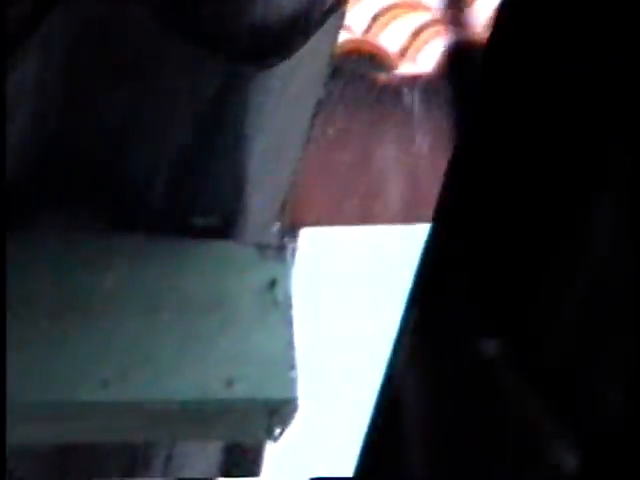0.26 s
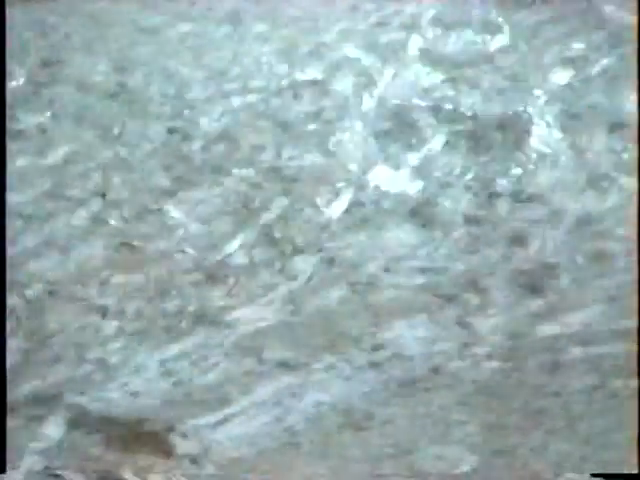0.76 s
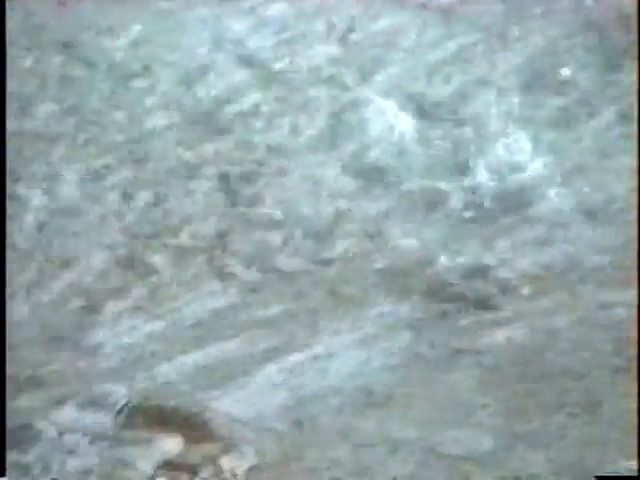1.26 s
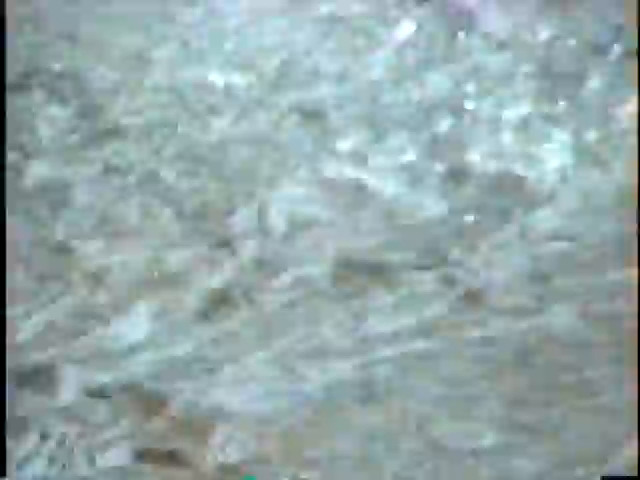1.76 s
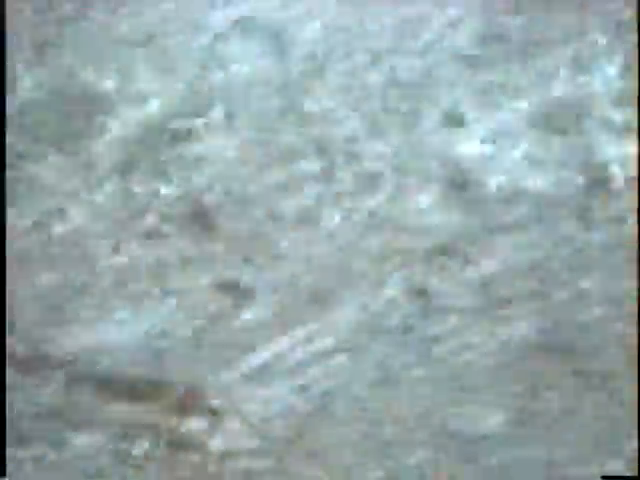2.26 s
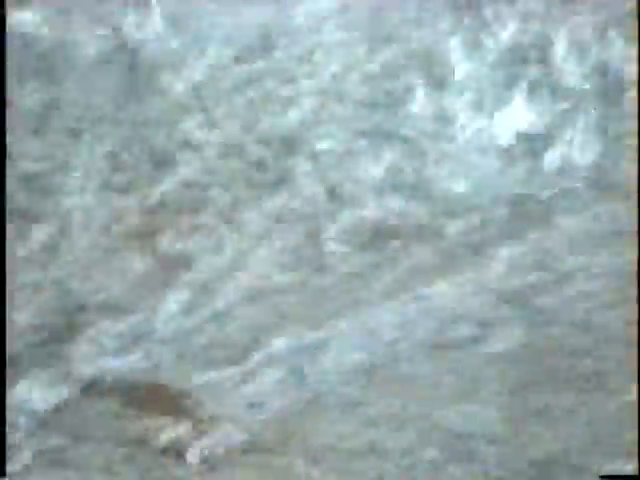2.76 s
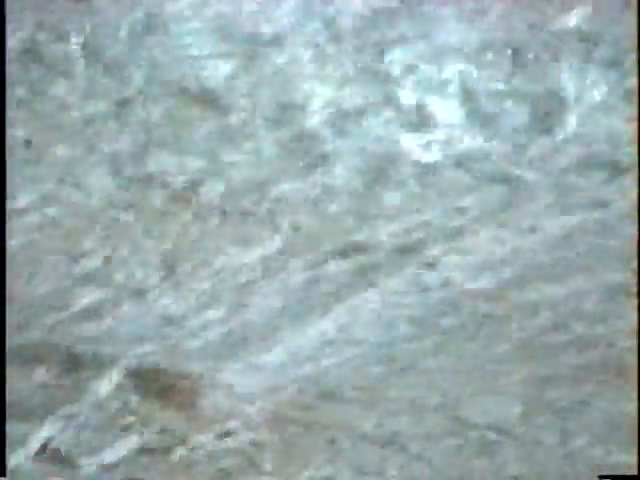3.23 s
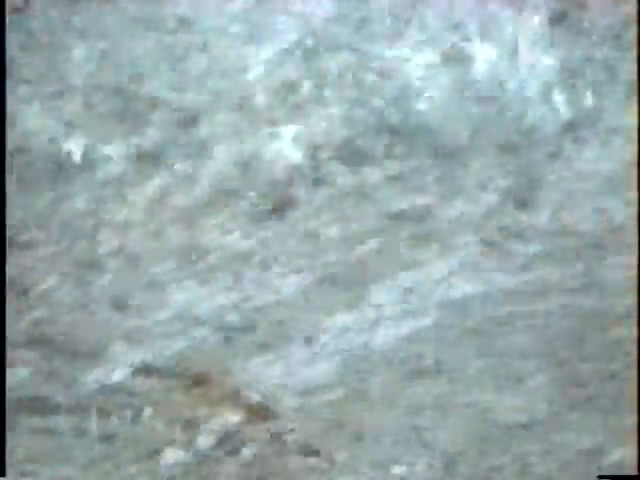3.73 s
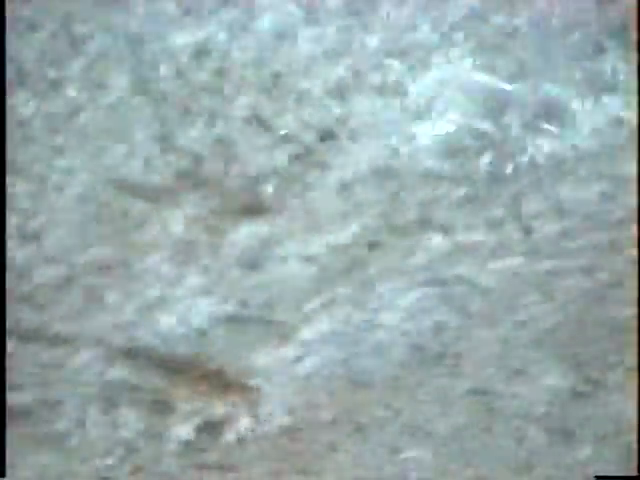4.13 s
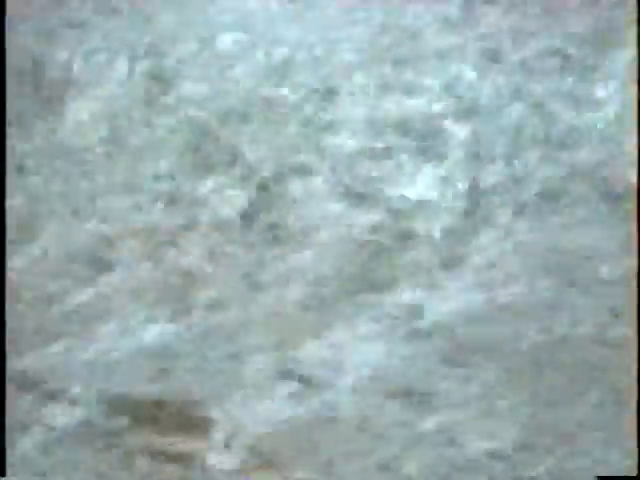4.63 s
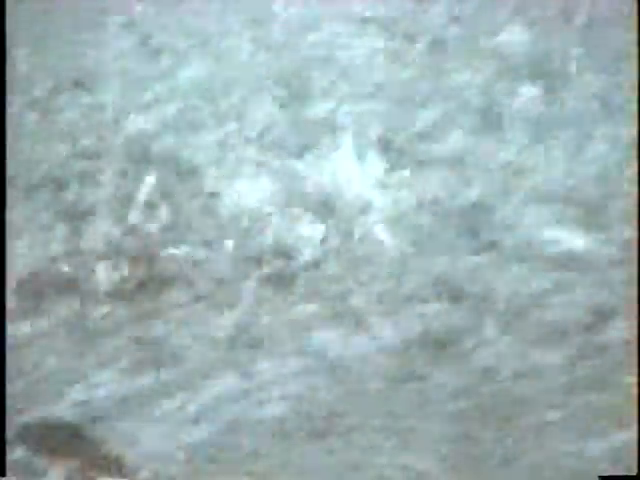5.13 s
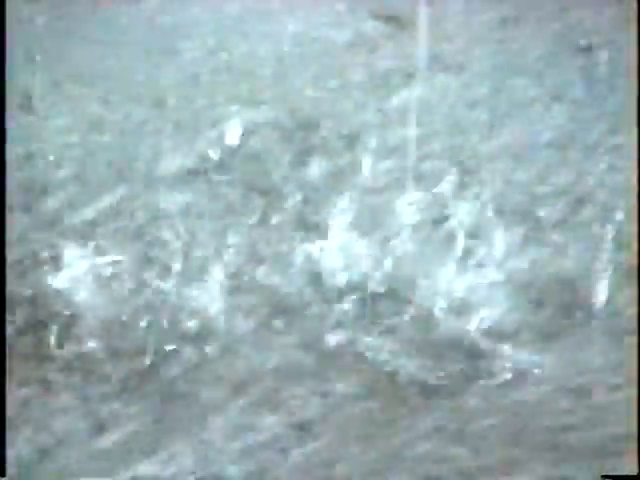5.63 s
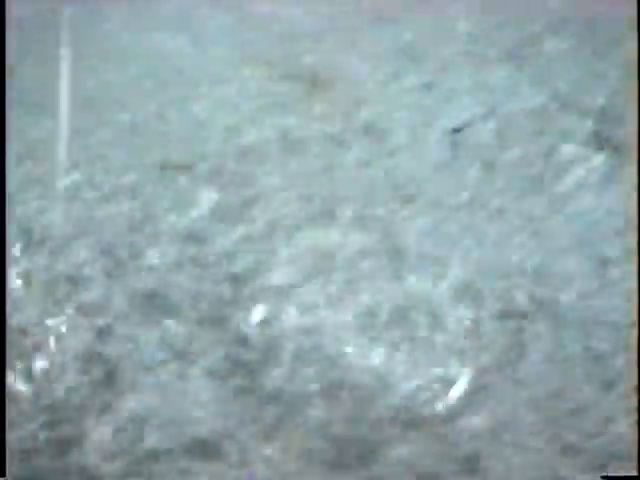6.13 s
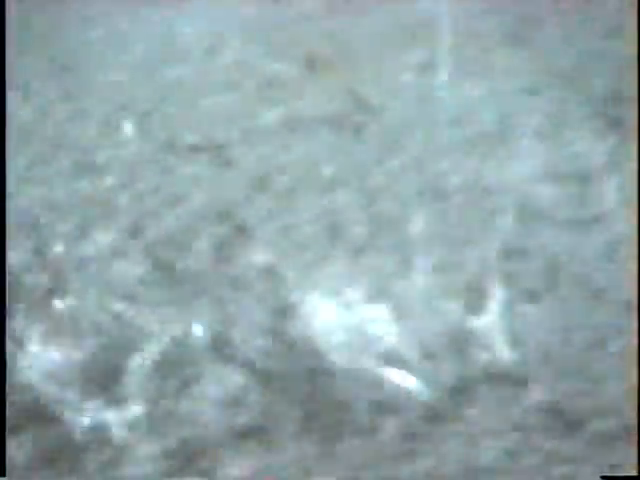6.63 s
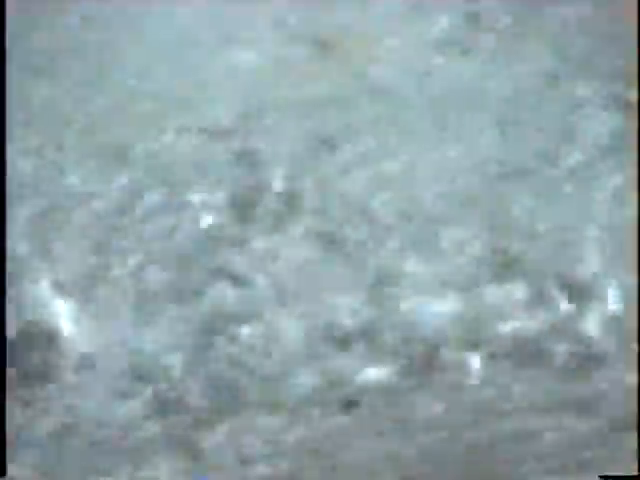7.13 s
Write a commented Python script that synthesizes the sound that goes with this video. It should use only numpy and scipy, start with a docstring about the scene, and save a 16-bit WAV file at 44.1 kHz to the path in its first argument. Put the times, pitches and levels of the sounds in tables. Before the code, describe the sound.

From 0 to 0.47 seconds heavy rain roars on a tile roof, mid-heavy and slightly hollow, with a small gurgle near 0.07 and a wet slap near 0.17. The sound drops almost to nothing for about 35 milliseconds, then returns abruptly at 0.5 as a dense downpour on flooded pavement, continuing without fading to about 7.4. It is a thick, broad wash with crisp patter, runoff spatter and tiny bubbles, its drumming and splashing fluctuating by a few decibels. Closer splashes slap irregularly, notably around 0.96, 2.0, 4.1 and sharply at 4.38; a tiny lull comes at 4.89. Hollow gurgles sound near 4.2, 4.7 and between 5.3 and 6.0, with soft low bumps mostly from 6.0 to 7.1. Nearly everything is on the left; the right holds only faint leakage and hiss. The camera's faint low hum and rumble are buried beneath, and the extreme treble is cut.

```python
"""Downpour under a roof, then over a pavement

Rain roars on a tile roof; after a break of some 35 ms it falls on a flooded pavement.
Shaped noise makes the wash of countless far drops; random clicks make the patter, the spray of water slapping
off the eaves and, through short rising rings, the bubbles. Gurgles and soft bumps are swelling bands of noise.
The camera takes the water, a faint mains hum and rumble on the left; the right has a faint leak and hiss.
A low drone of the electronics lies on both channels.
"""
import sys
import numpy as np
from scipy import signal
from scipy.fft import rfft, irfft
from scipy.io import wavfile

SR = 44100
rng = np.random.default_rng(int(sys.argv[2]) if len(sys.argv) > 2 else 0)


def unload_wav(signal):
    """Save mono or channel-first audio to the path in sys.argv[1] as 16-bit WAV at rate SR, clipped to [-1, 1]."""
    wavfile.write(
        sys.argv[1],
        SR,
        np.round(np.clip(np.atleast_2d(signal).T, -1, 1) * 32767).astype(np.int16),
    )


N = 325899
TIME = np.arange(N) / SR  # s
CUT_START, CUT_END = .4697, .5052  # the short break between roof and pavement, s


def gain_of(db):
    """Decibels to amplitude."""
    return 10 ** (np.asarray(db) / 20)


def evened(x):
    """Scales to rms 1."""
    return x / np.sqrt(np.mean(x ** 2) + 1e-20)


def add(mix, s, sound):
    """Mixes a sound in at time s, in seconds."""
    part = mix[max(round(s * SR), 0):][:len(sound)]
    part += sound[:len(part)]


def coloured(x, points):
    """Filters by a curve of (Hz, dB) points, joined along a logarithmic frequency axis."""
    hz, db = np.transpose(points)
    bins = np.fft.rfftfreq(len(x), 1 / SR)
    gain = gain_of(np.interp(np.log(bins + 1), np.log(hz), db))
    return irfft(rfft(x) * gain, len(x))


def band(x, hz, ratio):
    """A resonance from hz / ratio to hz * ratio, kept within the audible range."""
    ratio = max(ratio, 1.01)
    edges = np.clip([hz / ratio, hz * ratio], [10, 20], [SR / 3, SR / 2 - 100])
    return signal.sosfilt(signal.butter(2, edges, "band", fs=SR, output="sos"), x)


def swell(s, db):
    """A level curve as a gain around its median."""
    return gain_of(np.interp(TIME, s, db - np.median(db)))


def wander(depth_db, slow_hz, fast_hz, count=30):
    """A gain that drifts by depth_db (rms): a sum of sines at rates from slow_hz to fast_hz."""
    t = np.arange(0, TIME[-1] + .01, .002)
    rates = np.geomspace(slow_hz, fast_hz, count)
    drift = sum(np.sin(2 * np.pi * (hz * t + rng.random())) for hz in rates)
    return gain_of(depth_db * np.interp(TIME, t, evened(drift)))


def electronic_drone():
    """Low drone of the electronics: noise shaped by a spectrum."""
    # Each row: frequency in Hz, relative level in dB per Hz.
    drone_spectrum = [(20, -7), (55, -3), (80, 3), (100, 7), (130, -8), (200, -11), (420, -30), (1500, -60)]
    return gain_of(-79.5) * evened(coloured(rng.standard_normal(N), drone_spectrum))


def electronic_hiss():
    """Hiss of the electronics: noise in a band around 5.3 kHz."""
    return gain_of(-66) * evened(band(rng.standard_normal(N), 5300, ratio=1.7))


def mains_hum():
    """Faint mains hum: a steady 60 Hz sine."""
    return gain_of(-61.0) * np.sin(2 * np.pi * 60 * TIME)


def low_rumble():
    """Rumble at the bottom of hearing: noise from 10 to about 36 Hz."""
    return gain_of(-65) * evened(band(rng.standard_normal(N), 17, ratio=2.1))


def channel_leak(left):
    """The left channel leaks into the right through a filter, two samples ahead."""
    # Each row: frequency in Hz, gain of the leak in dB.
    leak_curve = [(100, -50), (450, -58), (1100, -55), (2000, -49.5), (4000, -46.5), (7000, -40),
                  (10000, -37), (12500, -37), (13500, -65)]
    return np.roll(coloured(left, leak_curve), -2)


def swellings(rows, width):
    """Short sounds that swell and fade: noise in a resonance of the given relative width."""
    out, t = np.zeros(N), TIME[:SR // 2]
    for s, db, hz, half in rows:
        start = max(s - t[-1] / 2, 0)
        shape = np.exp(-((start + t - s) / half) ** 2)
        ring = band(rng.standard_normal(len(t)), hz, 1 + width) * shape
        level = gain_of(db) * np.linalg.norm(shape) / np.linalg.norm(ring)
        add(out, start, level * ring)
    return out


def low_bumps():
    """Soft low bumps: swells of noise in a wide resonance."""
    # Each row: centre in seconds, relative level in dB, pitch in Hz, half length in seconds.
    bump_rows = [(.805, -46, 64.5, .015), (2.015, -50, 60, .014), (4.388, -46, 75, 0.0091),
                 (5.07, -49, 110, 0.022), (6.02, -44, 150, .03), (6.24, -42.5, 165, 0.033),
                 (6.30, -41, 149.5, .024), (6.365, -44, 175, .022), (7.10, -45, 140, .035)]
    return swellings(bump_rows, width=0.55)


def gurgles():
    """Hollow gurgles of running water: churning noise in a narrow resonance."""
    # Each row: centre in seconds, relative level in dB, pitch in Hz, half length in seconds.
    gurgle_rows = [(.07, -32, 663, 0.027), (4.21, -32, 650, 0.038), (4.70, -39, 580, 0.033),
                   (5.34, -38.5, 516, 0.085), (5.50, -36.5, 460, 0.081), (5.83, -37, 473, 0.032),
                   (6.01, -35, 574, 0.046)]
    return swellings(gurgle_rows, width=0.038)


def droplets(size, per_s, spread_db):
    """Clicks of many small and few large drops at random times and of either sign."""
    chance, weight, sign = rng.random((3, size))
    height = gain_of(spread_db * np.minimum(-np.log(1 - weight), 5))
    return evened(height * np.sign(sign - .5) * (chance < per_s / SR))


def bubbles(count=28, per_s=22, cycles=7, spread_db=3):
    """Drops trap tiny bubbles that ring for a few cycles and rise in pitch."""
    out, t = np.zeros(N), TIME[:SR // 30]
    for hz in np.geomspace(900, 11000, count):
        age = t * hz / cycles  # in decay times
        ring = np.sin(2 * np.pi * hz * t * (1 + 0.015 * age)) * np.exp(-age)
        # the shorter, higher rings get more weight
        out += hz * signal.oaconvolve(droplets(N, per_s, spread_db), ring)[:N]
    return evened(out)


def splash(hz, decay, ratio, slap=0.68, slap_s=0.00076):
    """A lump of water slaps down sharply; the spray of its droplets dies away over decay seconds."""
    t = TIME[:SR // 6]
    spray = evened(band(droplets(len(t), per_s=14000, spread_db=2.5), hz, ratio))
    return spray * (np.exp(-t / decay) + slap * np.exp(-t / slap_s))


def runoff(count=380, spread_db=1.5, decay=0.024):
    """Water from the eaves: an irregular string of splashes, each with its own size and brightness."""
    out = np.zeros(N)
    for k, (late, size, tone, length) in enumerate(rng.random((count, 4))):
        hz = 2600 * 3.2 ** tone
        height = gain_of(spread_db * min(-np.log(1 - size), 3)) * np.sqrt(hz)
        when = (k + 2 * late) / count * TIME[-1]  # a steady spill, each lump delayed at random
        add(out, when, height * splash(hz, decay * (.5 + length), ratio=2.5))
    return evened(out)


def big_splashes():
    """The nearest lumps of water, each slapping down in its own band."""
    # Each row: start in seconds, relative level in dB, centre in Hz, decay in seconds.
    splash_rows = [(.173, -26, 3000, .02), (0.507, -26, 4000, .012), (.960, -24.5, 6450, 0.039),
                   (1.144, -30, 5000, .02), (1.565, -26, 3000, .017), (1.726, -25, 2900, 0.018),
                   (2.009, -21.5, 3000, .008), (2.250, -25.5, 3300, .018), (2.323, -27, 4000, 0.017),
                   (2.560, -25.5, 3300, 0.022), (3.200, -26, 4500, .012), (3.900, -32, 6500, 0.033),
                   (4.095, -24.5, 4100, 0.026), (4.157, -24, 3500, 0.015), (4.383, -19.5, 4000, .005),
                   (4.900, -30, 4000, .01), (5.014, -26, 3500, 0.017), (5.064, -24, 6000, .018),
                   (5.275, -28, 3000, .018), (5.745, -29, 5000, .018), (5.79, -27, 6000, 0.025),
                   (6.238, -28, 6100, 0.031), (6.879, -30, 3500, .018)]
    out = np.zeros(N)
    for s, db, hz, decay in splash_rows:
        add(out, s, gain_of(db) * splash(hz, decay, ratio=1.43))
    return out


def rain(runoff_db=-4.5, patter_db=-9, bubbles_db=-13):
    """A noise wash of far drops joins runoff, patter and bubbles; the camera's housing rings broadly."""
    # Each row: frequency in Hz, gain of the housing in dB.
    housing_curve = [(1150, 0), (1480, 0.5), (1850, 0)]
    wash_curve = [(700, 1.5), (1500, 3.8), (3000, 5.47), (8000, 3.87), (14000, 4.2)]  # Hz, dB
    drops = coloured(rng.standard_normal(N), wash_curve)
    drops += gain_of(runoff_db) * runoff()
    drops += gain_of(patter_db) * band(droplets(N, per_s=1100, spread_db=1.5), 5100, ratio=2.85)
    drops += gain_of(bubbles_db) * bubbles()
    return coloured(drops, housing_curve)


def tile_roof(drops, level_db=-23):
    """Rain coloured by the tiles; its roar surges."""
    # Each row: frequency in Hz, relative level in dB per Hz.
    roof_spectrum = [(24, -77), (40, -46), (270, -13.5), (338, -6.5), (373, -12), (454, -9), (527, -7.5),
                     (659, -4.5), (910, -2.5), (1400, -5.5), (1960, -11.5), (4910, -14), (6620, -16.5),
                     (8070, -17.5), (15000, -33)]
    # Each row: time in seconds, change of level in dB.
    surge_curve = [(0, -1.5), (.06, .5), (.2, -1.1), (.28, 0), (.47, 0.3)]
    surge_db = np.interp(TIME, *np.transpose(surge_curve))
    return gain_of(level_db + surge_db) * evened(coloured(drops, roof_spectrum))


def pavement(drops, level_db=-23.5, spray_follows=0.8, lull_share=0.34):
    """Rain on the flooded pavement: murmur, drumming, splashing and spray swell, each in its own range."""
    # Each row: frequency in Hz, relative level in dB per Hz.
    yard_spectrum = [(47, -53), (80, -26), (120, -23), (165, -15.5), (230, -10), (285, -6), (404, -4.5),
                     (574, -0.5), (815, -0.44), (1160, 0.57), (2040, -6), (5720, -6.5), (8490, -9),
                     (10300, -13.5), (15000, -29.5)]
    # How hard the water falls, heard around each column's median.
    # Each row: time in seconds, level of the low drumming in dB, level of the splashing in dB.
    flow_curve = [(0.52, -30.5, -25.5), (0.84, -29.4, -24.9), (1.04, -31.5, -26.5), (1.34, -28.5, -24),
                  (1.84, -29.5, -25), (1.9, -28, -24.1), (2.08, -30.5, -26.5), (2.36, -29.8, -26),
                  (2.42, -27.4, -23.5), (2.64, -29, -24.5), (3.94, -28.0, -24.5), (4.24, -30.5, -25),
                  (4.34, -27.6, -24.3), (4.44, -30.0, -26), (5.12, -28.2, -24), (6.28, -29.6, -25),
                  (6.58, -28.5, -25.5), (6.84, -28.5, -23.5), (6.94, -30.5, -25.5), (7.14, -27, -24.9),
                  (7.22, -29.1, -23.8), (7.38, -27.0, -24)]
    # Low murmur under the rain, heard around its median. Each row: time in seconds, level in dB.
    murmur_curve = [(0.52, -58), (1.58, -62), (1.66, -58), (3.42, -58), (3.58, -69.5), (3.74, -58.5),
                    (4.22, -61), (5.9, -56)]
    # Short lulls in the splashing. Each row: centre in seconds, depth in dB, half length in seconds.
    lull_rows = [(4.233, 2.5, 0.018), (4.886, 6.5, .009), (5.377, 3, 0.023), (5.863, 1.8, .03),
                 (6.33, 1.8, 0.028)]

    sound = gain_of(level_db) * evened(coloured(drops, yard_spectrum))
    murmur = coloured(sound, [(160, 2.0), (200, 0), (270, -37)])
    drumming = coloured(sound, [(1400, -0.5), (1900, 1), (2600, -40)]) - murmur
    spray = coloured(sound, [(4000, -38), (5600, -3), (7000, -8)])
    splashing = sound - murmur - drumming - spray

    s, drumming_db, splashing_db = np.transpose(flow_curve)
    flow = swell(s, splashing_db)
    lull_db = sum(depth * np.exp(-((TIME - at) / half) ** 2) for at, depth, half in lull_rows)
    lull = gain_of(-lull_db)

    far = murmur * swell(*np.transpose(murmur_curve)) * wander(depth_db=2.0, slow_hz=3, fast_hz=10)
    far += drumming * swell(s, drumming_db)
    # the spray swells by spray_follows dB for each dB of splashing
    near = spray * flow ** spray_follows * wander(depth_db=0.31, slow_hz=1.6, fast_hz=12)
    near += splashing * flow
    near *= wander(depth_db=0.43, slow_hz=3, fast_hz=14)
    # murmur and drumming take only lull_share of each lull's dB
    return far * lull ** lull_share + near * lull


def short_break(remnant_db=-21, fade=0.0048, floor_db=-47):
    """A gain that drops, dies away over fade seconds to a floor, and comes back at once."""
    gain = gain_of(remnant_db) * np.exp(-abs(TIME - CUT_START) / fade) + gain_of(floor_db)
    return np.where((TIME > CUT_START) & (TIME < CUT_END), gain, 1)


def scene():
    """Roof, then pavement on the left; leak and hiss on the right; the drone on both."""
    drops = rain()
    water = np.where(TIME < CUT_START, tile_roof(drops), pavement(drops))
    water += big_splashes() + gurgles() + low_bumps()
    # doubling lifts all water, hum and rumble levels by 6 dB
    left = 2 * (water * short_break() + mains_hum() + low_rumble())
    right = channel_leak(left) + electronic_hiss()
    return np.array([left, right]) + electronic_drone()


def record(dry):
    """A low-pass at 15.3 kHz limits the band, and each channel gets a small steady offset."""
    offset = np.array([[.0146], [.0346]])  # left, right; full scale is 1
    low_pass = signal.firwin(611, 15300, window=("kaiser", 9), fs=SR)
    return signal.oaconvolve(dry, low_pass[None], "same", axes=1) + offset


dry = scene()
out = record(dry)
unload_wav(out)
```